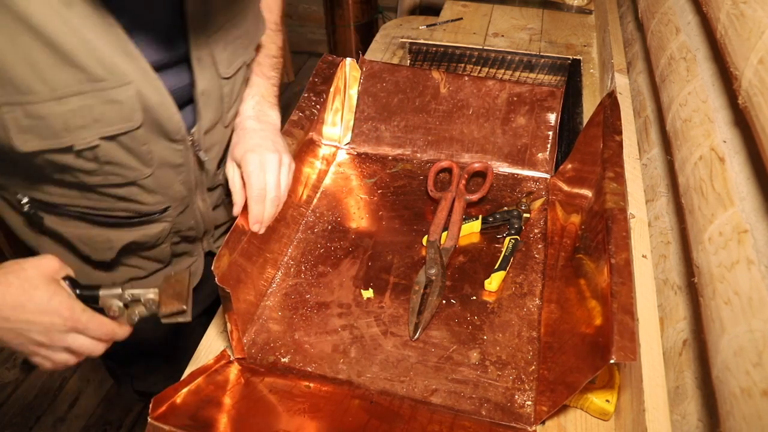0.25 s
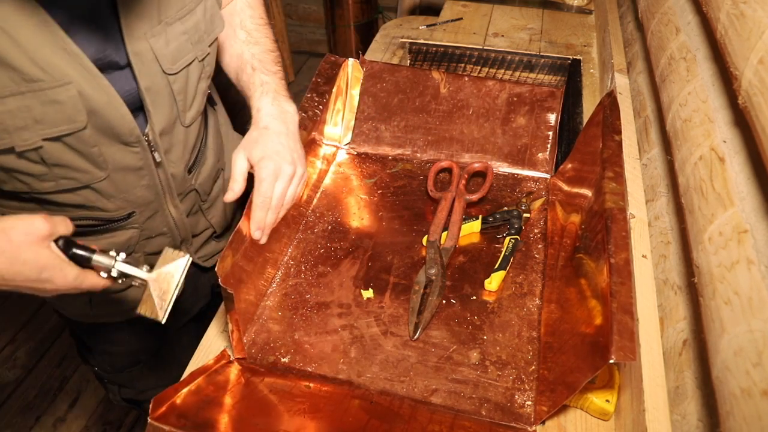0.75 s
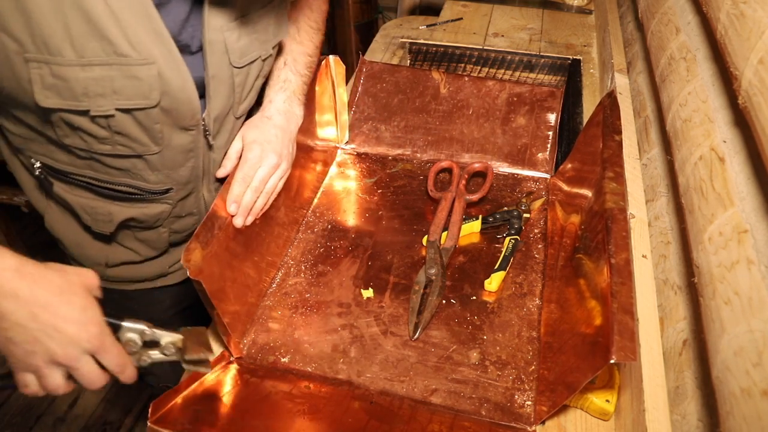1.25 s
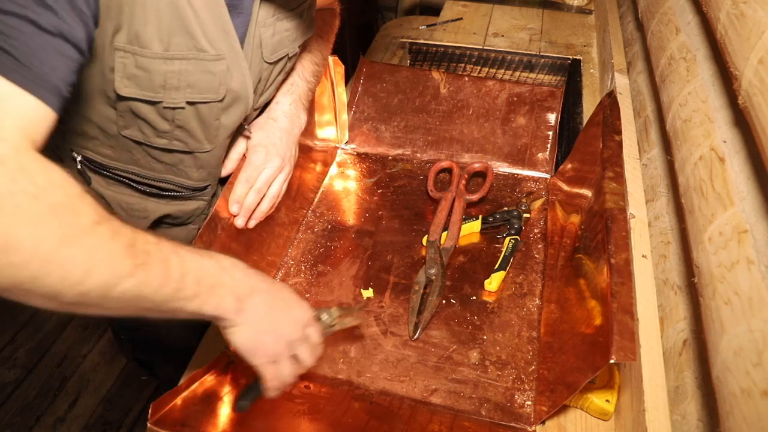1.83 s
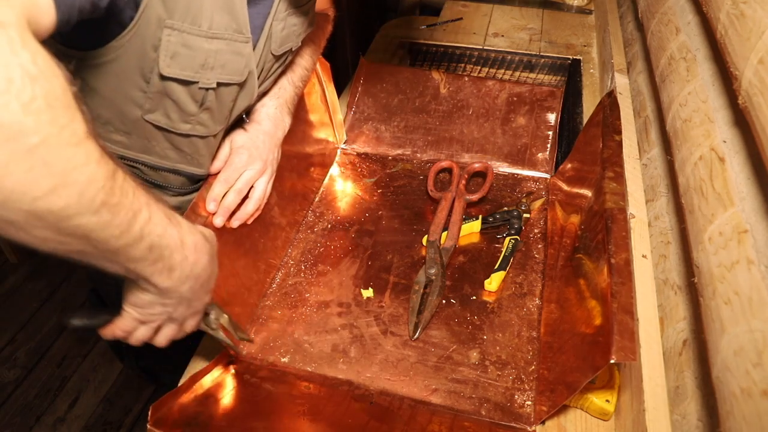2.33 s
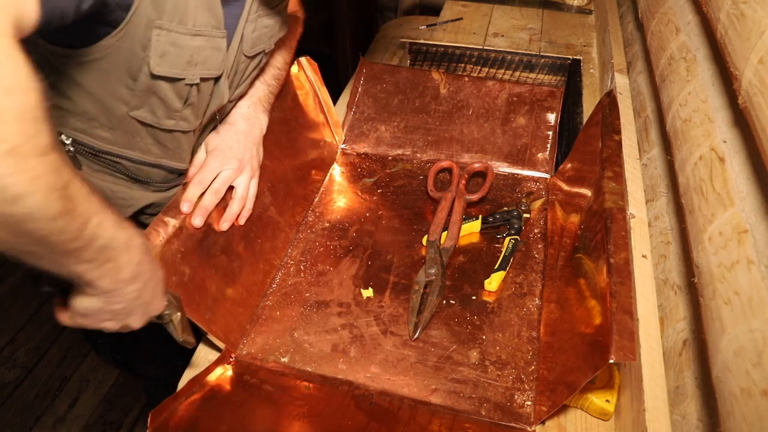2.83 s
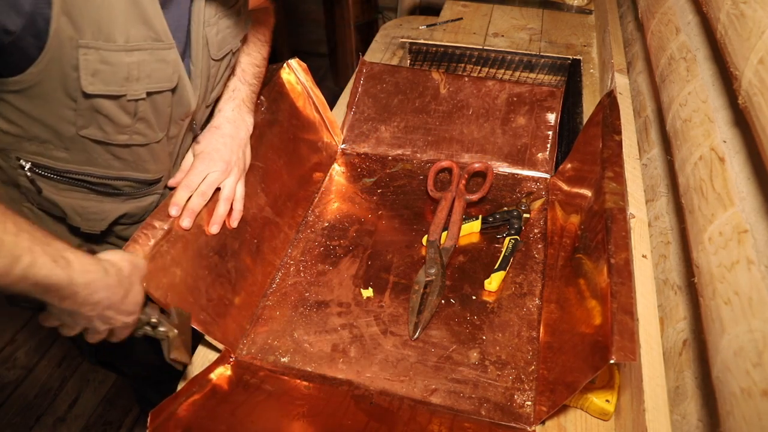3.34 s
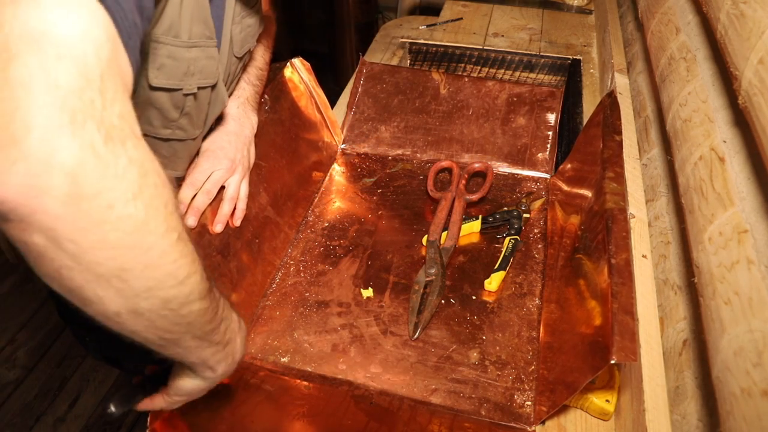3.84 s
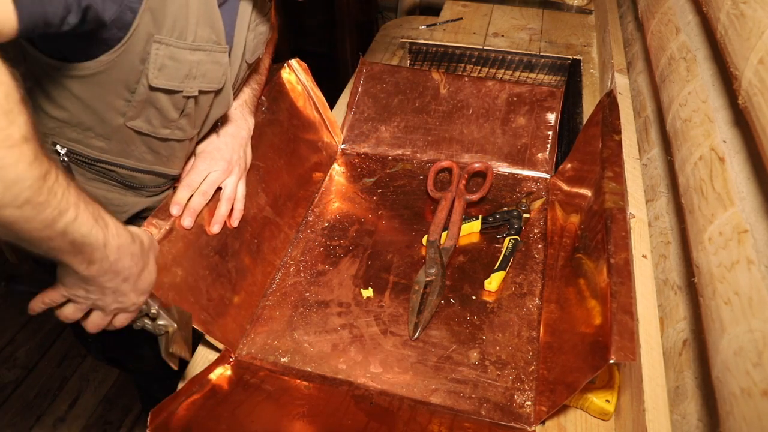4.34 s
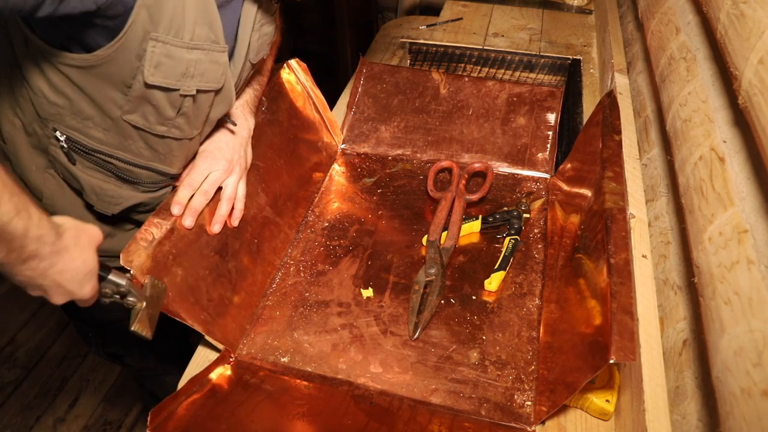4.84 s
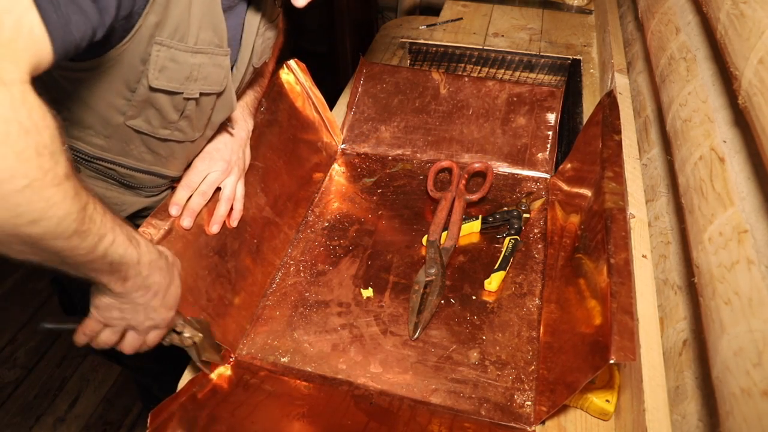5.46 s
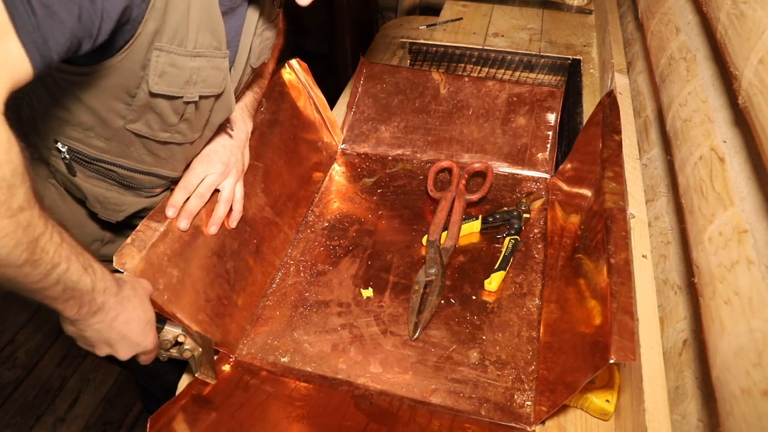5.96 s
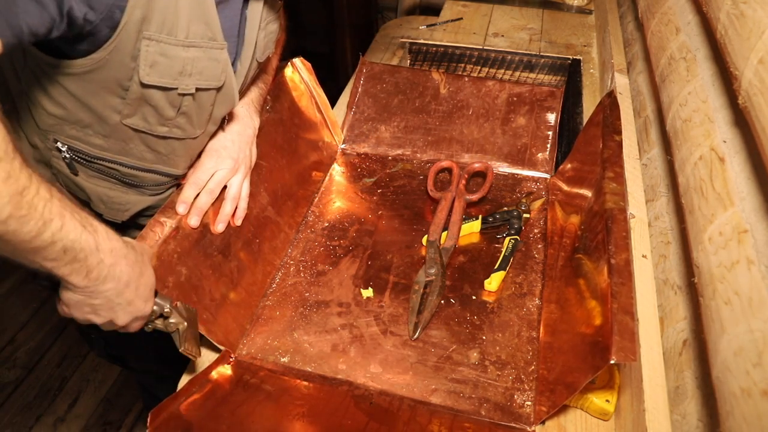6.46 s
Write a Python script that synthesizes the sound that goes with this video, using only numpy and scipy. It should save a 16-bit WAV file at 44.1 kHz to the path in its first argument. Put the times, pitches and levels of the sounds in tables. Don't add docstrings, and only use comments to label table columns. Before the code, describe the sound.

Quiet rubbing and light taps give way to rattling, creaking sheet copper, plier clacks and low booms in a small workshop.

```python
import sys
import numpy as np
from scipy import signal
from scipy.fft import rfft, irfft
from scipy.io import wavfile
from scipy.ndimage import uniform_filter1d

SR = 44100
rng = np.random.default_rng(int(sys.argv[2]) if len(sys.argv) > 2 else 0)


def undo_db(level):
    steps = np.asarray(level, float) / 20
    return 10 ** steps


def waveform_to_disk(signal):
    frames = np.transpose(np.atleast_2d(signal))
    scaled = np.clip(frames, -1, 1) * 32767
    samples = np.round(scaled).astype(np.int16)
    wavfile.write(sys.argv[1], SR, samples)


N = 295911

# start in seconds, peak in dB, pitch in Hz,
# time to fall 60 dB in seconds, share sent into the sheet in dB.
BUCKLES = [
    (.545, -14, 192, 0.12, 3),
    (1.181, -10, 175.4, 0.36, 3),
    (2.481, -11.5, 226, 0.11, -7),
    (2.836, -0.5, 125, 0.14, -16),
    (2.915, -5, 319, .04, -24),
    (4.408, -7, 132, 0.06, -14),
    (6.212, -18.5, 201, 0.31, 11),
]


def evened(x):
    return x / np.sqrt(np.mean(x ** 2) + 1e-20)


def read(points, hz):
    f, value = np.transpose(points)
    return np.interp(np.log(hz + 1), np.log(f + 1), value)


def add(mix, s, sound):
    part = mix[round(s * SR):][:len(sound)]
    part += sound[:len(part)]


def coloured(x, points):
    hz = np.fft.rfftfreq(len(x), 1 / SR)
    return irfft(rfft(x) * undo_db(read(points, hz)), len(x))


def resonate(x, hz, width):
    turn = np.exp(2j * np.pi * np.cumsum(hz * np.ones(len(x))) / SR)
    r = np.exp(-np.pi * width / SR)
    smooth = signal.lfilter([1 - r], [1, -r], x / turn + 1e-18)
    return 2 * (turn * smooth).real


def strokes(rows, rise_db_per_s, fall_db_per_s):
    t = np.arange(0, N / SR + .01, .001)[:, None]
    s, hold, db = np.transpose(rows)
    before_db = rise_db_per_s * np.maximum(s - t, 0)
    after_db = fall_db_per_s * np.maximum(t - s - abs(hold), 0)
    level = np.sqrt((undo_db(db - (before_db + after_db)) ** 2).sum(axis=1))
    return np.interp(np.arange(N) / SR, t[:, 0], level)


def hiss():
    # Hz, dB per Hz.
    hiss_colour = [(15, -38), (25, 5), (45, 7), (92, -1), (560, -7.5), (677, -2), (911, -8), (1130, -7.5),
                   (1650, -31), (1940, -14), (4370, -21.5), (16000, -29.5)]
    whine_hz, whine_db = 10648, -76
    whine = np.sqrt(2) * undo_db(whine_db) * np.sin(2 * np.pi * whine_hz * np.arange(N) / SR)
    return undo_db(-45.5) * evened(coloured(rng.standard_normal(N), hiss_colour)) + whine


def wobble():
    # time in seconds, level in dB.
    leaning = [(0.0, -36), (.15, -40), (.45, -66), (.6, -34), (.8, -39.5), (1.1, -59), (1.4, -38),
               (1.76, -40), (2.11, -61), (2.3, -35), (3.0, -43), (3.27, -25.5), (3.55, -35.5),
               (4.76, -35.5), (4.9, -40), (5.4, -30.5), (6.13, -46), (6.4, -32.5)]
    # Hz, dB per Hz.
    rumble_colour = [(15, -57), (25, -18), (92, -2), (113, -5), (167, -14), (200, -0.5), (260, -6),
                     (440, -120)]
    shake_db, shake_hold_s, shake_fall_db_per_s = -22.5, 0.053, 122
    s, db = np.transpose(leaning)
    rumble = coloured(rng.standard_normal(N), rumble_colour)
    rumble = rumble + undo_db(6.0) * resonate(rumble, 68.3, 7.1) + undo_db(3) * resonate(rumble, 106.6, 10.4)
    shakes = [(row[0], shake_hold_s, shake_db + row[1]) for row in BUCKLES]
    shake = strokes(shakes, 770, shake_fall_db_per_s)
    lean = undo_db(np.interp(np.arange(N) / SR, s, db))
    return (lean + shake) * evened(rumble)


def effort():
    # start in seconds, hold in seconds, force in dB, stiffness in dB.
    jolts = [(.549, .08, -38, -12), (.001, .03, -34, -1.5), (1.197, 0.032, -26.5, -1.5),
             (1.495, 0.0092, -37.5, 2.5), (2.836, 0.03, -22, 6.5), (2.93, 0.05, -23.5, 4),
             (2.337, 0.029, -29, -17), (2.478, 0.094, -19.5, -1.5), (2.743, .01, -25, 2),
             (2.789, 0.0091, -23.5, 6.5), (3.625, 0.073, -25.5, 1), (3.906, 0.15, -29, 6.5),
             (4.117, 0.18, -29, 8.5), (4.28, .01, -36.5, 12), (4.407, 0.033, -25, 3.5),
             (5.092, 0.035, -33.5, 2.5), (5.65, .17, -27, -2.5), (6.212, 0.07, -22, 3),
             (6.334, 0.053, -21, -2), (6.59, 0.019, -19, -2)]
    # full bend in seconds, hold in seconds, force in dB, stiffness in dB.
    bends = [(1.347, 0.017, -44, -24), (1.65, .02, -39, -30), (1.785, .05, -40.5, -4),
             (2.211, 0.09, -37, -2), (3.073, 0.12, -20.5, -12.5), (3.442, 0.043, -22.5, 5),
             (3.76, 0.052, -23.5, 0.5), (4.502, 0.24, -25, 2.5), (4.85, 0.017, -32.5, 0),
             (4.994, 0.025, -34.5, 1), (5.244, 0.047, -25.5, 3.5), (5.522, 0.052, -34.5, 14.5),
             (6.497, .01, -24.5, 9)]
    # start in seconds, hold in seconds, force in dB, brightness in dB.
    slips = [(1.2, .005, -34, -8), (1.49, .01, -37, -20), (1.756, .07, -42.5, -12), (2.339, .02, -28, -12),
             (2.481, 0.0034, -21.5, 1.5), (2.483, 0.088, -25.5, -11), (2.74, .005, -28.5, -7),
             (2.777, 0.0036, -21, -27), (2.917, .02, -27.5, -22), (3.2, 0.016, -47, -7),
             (3.371, 0.062, -29, -7.5), (3.616, 0.023, -26, -18), (3.907, 0.0073, -20.5, -14),
             (4.111, 0.042, -20, -17.5), (4.276, .012, -17, -8), (4.404, .005, -21.5, -26),
             (4.512, 0.014, -21, -5), (4.567, 0.056, -18, -10.5), (4.845, .01, -33.5, -28),
             (5.086, 0.04, -38, -12), (5.475, 0.035, -31.5, -20), (5.642, 0.004, -16, -20),
             (5.667, 0.13, -30.5, -30), (6.21, 0.019, -21, -13), (6.32, 0.018, -21.5, -23),
             (6.587, 0.0092, -31, -7)]
    # full pull in seconds, hold in seconds, force and brightness in dB.
    drags = [(3.87, .03, -37, -8), (2.665, .02, -39, -9), (3.75, .02, -33, -10), (3.21, .08, -51, -8),
             (0.078, .005, -33.5, -3), (2.208, 0.061, -35.5, -7), (3.467, 0.022, -20, -10),
             (4.1, 0.023, -34.5, -6), (5.206, 0.045, -17.5, -6.5), (5.55, 0.099, -26, -7.5),
             (6.367, 0.016, -37.5, 4.5), (6.49, 0.01, -19, -7), (4.48, .01, -35, -1), (3.82, .03, -39, -14),
             (5.16, .01, -33, -9), (5.78, .03, -33, -24), (3.66, 0.0086, -30.5, -18),
             (4.2, 0.014, -27, -15), (0.736, 0.0084, -58, -10)]
    release = [92, 125, 148.4, 240]
    rest = [-57.5, -54, -55.5, -68]
    sudden_db_per_s, growing_db_per_s = 5000, 255
    bending = [(jolts, sudden_db_per_s), (bends, growing_db_per_s)]
    gripping = [(slips, sudden_db_per_s), (drags, growing_db_per_s)]
    levels = []
    for k, kinds in enumerate([bending, bending, gripping, gripping]):
        level = undo_db(rest[k])
        for rows, rise in kinds:
            moves = [(s, hold, db + k % 2 * tilt_db) for s, hold, db, tilt_db in rows]
            level = level + strokes(moves, rise, release[k])
        levels.append(level)
    return levels


def scrape():
    splits = [450, 1400, 4500]
    # Hz, dB per Hz.
    scrape_colour = [(18, -50), (30, -19), (98, -4.5), (174, -9), (311, -1.5), (415, -3.5), (684, 3.5),
                     (962, -0.5), (2750, -6.5), (4300, -12), (6300, -21), (10200, -26), (16000, -16)]
    grain_size = undo_db(3.0 * np.minimum(rng.exponential(1, N), 3))
    grain_here = rng.random(N) < 2500 / SR
    slips = rng.standard_normal(N) * grain_size * grain_here
    stutter = evened(uniform_filter1d(uniform_filter1d(rng.standard_normal(N), 300), 300))
    grains = (evened(slips) + 0.76 * rng.standard_normal(N)) * undo_db(2.5 * stutter)
    hz = np.fft.rfftfreq(N, 1 / SR)
    spectrum = rfft(coloured(grains, [(60, -40), (140, 7.5), (16000, -10)]))
    spectrum = spectrum * undo_db(read(scrape_colour, hz))
    below = [0] + [1 / (1 + (hz / f) ** 6) for f in splits] + [1]
    rub = np.zeros(N)
    for level, low, high in zip(effort(), below, below[1:]):
        rub += level * evened(irfft(spectrum * (high - low), N))
    return rub


def sheet_ring(strong_db):
    # Hz, dB, time to fall 60 dB in seconds.
    strong_modes = [(112, -42, 5.0), (223.5, 1.5, 0.64), (312.1, -11.5, 5.0), (390, -10.5, 0.3),
                    (566, -14, 0.18), (685, -17.5, 0.053), (841, -19, 0.91), (915, -13, 0.31),
                    (1140, -51, 1.2), (1060, -11.5, 2.6), (1110, -38, 1.3), (1602, -17, 0.13),
                    (2140, -26, 0.41), (2870, -2.5, 0.36)]
    # Hz, time to fall 60 dB in seconds.
    dense_decay = [(60, 0.14), (300, 0.83), (1000, 0.42), (3000, 0.14), (6000, 0.12), (15000, 0.058)]
    hz, t, z = signal.stft(rng.standard_normal(SR), SR, nperseg=512)
    t60 = np.maximum(read(dense_decay, hz), .02)[:, None]
    dense = signal.istft(z * undo_db(-60 * t / t60) / np.sqrt(t60), SR, nperseg=512)[1][:SR]
    t = np.arange(SR) / SR
    strong = np.zeros(SR)
    for f, db, t60 in strong_modes:
        bent_hz = f * rng.uniform(0.95, 1.015)
        strong += undo_db(.5 * db - 60 * t / min(t60, .3)) * np.sin(2 * np.pi * bent_hz * t)
    ring = evened(dense) + undo_db(strong_db) * evened(strong)
    return ring / np.linalg.norm(evened(dense))


def sheet(drive):
    turn = 2 * np.pi * 1.099 * np.arange(N) / SR
    out = np.zeros(N)
    for k in range(3):
        share = np.sqrt(2 / 3) * np.cos(turn / 2 - k * np.pi / 3)
        out += signal.oaconvolve(drive * share, sheet_ring(-16.5))[:N]
    return out


def brushes():
    # middle in seconds, level in dB, half-length in seconds.
    passes = [
        (0.356, -47.5, 0.11),
        (0.741, -48.5, .03),
        (1.074, -51.5, 0.049),
        (1.436, -50, 0.057),
        (1.61, -48, .03),
        (4.998, -42.5, 0.025),
    ]
    # Hz, dB per Hz.
    brush_colour = [(300, -16), (1000, -6), (2600, 7), (5000, -5), (14000, -17)]
    t = np.arange(N) / SR
    swell = sum(undo_db(db) * np.exp(-((t - s) / half) ** 2) for s, db, half in passes)
    return swell * evened(coloured(rng.standard_normal(N), brush_colour))


def held_shapes(rub):
    # start in seconds, end in seconds, low ring in Hz, high ring in Hz, level in dB.
    shapes = [(0.26, 0.517, 386, 600, 3), (1.19, 1.34, 1030, 2390, 2), (1.783, 1.91, 670, 2150, -3),
              (.56, .85, 310, 390, 2.5), (2.19, 2.43, 497, 1033, 5), (2.485, 2.595, 532, 1030, 1),
              (2.93, 3.363, 310, 697, -4), (3.375, 3.556, 1075, 1600, -1.5), (3.655, 3.77, 1083, 1600, 2),
              (3.74, 3.83, 700, 1000, 2), (5.29, 5.37, 600, 1050, 2), (5.19, 5.28, 2300, 4200, 0),
              (6.49, 6.52, 950, 3900, 2), (2.785, 2.84, 2750, 4300, 0), (3.91, 4.285, 682, 773, 4),
              (4.27, 4.398, 689, 2670, -13), (4.42, 4.802, 307, 528, 1.5), (4.57, 4.655, 2410, 2705, 3),
              (5.2, 5.33, 1040, 1793, -7.5), (5.482, 5.637, 910, 1670, 0), (5.65, 5.701, 1595, 2190, -4),
              (6.205, 6.313, 520, 2710, 1.5), (6.297, 6.395, 690, 1870, 3), (6.443, 6.535, 506, 2630, 6.5)]
    fade_s, width_hz, width_share = .012, 7.1, 0.03
    rise = .05
    out = np.zeros(N)
    for start, end, *rings, db in shapes:
        part = rub[round(start * SR):round(end * SR)]
        creep = 1 + rise * np.linspace(-.5, .5, len(part))
        sung = undo_db(db) * sum(resonate(part, hz * creep, width_hz + width_share * hz) for hz in rings)
        add(out, start, sung * signal.windows.tukey(len(part), 2 * fade_s / (end - start)))
    return out


def ticks():
    # start in seconds, peak in dB, low ping in Hz, high ping in Hz, high ping in dB.
    clicks = [(.336, -35.5, 3000, 5500, -21), (.4674, -42, 2000, 7400, -6), (2.0014, -31.5, 2550, 5430, -8),
              (3.1921, -36.5, 2080, 8700, -2), (3.6341, -13, 2610, 10300, -13),
              (4.263, -35, 7400, 12000, -1), (4.41, -18, 2480, 10400, -5), (4.8294, -27, 2400, 4600, -40),
              (4.9154, -32, 2530, 5330, -31), (4.9404, -29, 2410, 4510, -38), (5.087, -29, 2450, 4750, -23),
              (5.105, -26, 2350, 4520, -11), (5.552, -21, 2520, 4860, 0.5), (6.1898, -32, 2770, 4960, -26),
              (6.4394, -30, 2610, 7360, 2), (6.5857, -27, 1910, 5550, 4)]
    ping_t60_s, snap_t60_s = .018, .03
    out, t = np.zeros(N), np.arange(SR // 8) / SR
    for s, db, low_hz, high_hz, high_db in clicks:
        pings = np.sin(2 * np.pi * low_hz * t) + undo_db(high_db) * np.sin(2 * np.pi * high_hz * t)
        snap = resonate(resonate(rng.standard_normal(len(t)), 1.2 * low_hz, 2000), 1.2 * low_hz, 2000)
        snap = .5 * evened(snap) * undo_db(-60 * t / snap_t60_s)
        add(out, s, undo_db(db - 1) * (pings * undo_db(-60 * t / ping_t60_s) + snap))
    return out


def thumps():
    slap_db = -7.5
    direct, sent, t = np.zeros(N), np.zeros(N), np.arange(SR // 2) / SR
    for s, db, hz, t60, sent_db in BUCKLES:
        rumble = resonate(resonate(rng.standard_normal(len(t)), 330, 330), 330, 330)
        modes = [(1, 1), (1.4, 0.66), (1.5, 0.29)]
        boom = sum(share * np.sin(2 * np.pi * ratio * hz * t) for ratio, share in modes)
        onset = np.minimum(t / 0.0033, 1)
        thump = undo_db(db - 5.5) * (boom + undo_db(slap_db) * evened(rumble)) * onset
        push = undo_db(-60 * t / .04)
        add(direct, s, thump * (undo_db(-60 * t / t60) + 0.36 * push))
        add(sent, s, undo_db(sent_db + 6) * thump * push)
    return direct, sent


def pops():
    # start in seconds, peak in dB, pitch in Hz, time to fall 60 dB in seconds.
    dents = [(1.195, -8, 202, 0.04), (1.211, -8, 226, 0.04), (1.264, -17, 218, 0.04),
             (2.344, -18, 476, 0.04), (2.835, -2, 256, 0.04), (2.851, -4, 479, 0.04),
             (2.865, -5, 296, 0.04), (2.912, -5, 331, 0.04), (2.921, -1, 318, 0.04), (3.129, -8, 218, 0.04),
             (3.181, -11, 250, 0.04), (3.682, -5, 1070, 0.04), (3.745, -7, 380, 0.04),
             (3.764, -7, 689, 0.04), (3.974, -6, 794, 0.04), (4.006, -9, 694, 0.04), (4.121, -6, 692, 0.04),
             (4.485, -6, 307, 0.04), (4.645, -4, 310, 0.04), (5.194, -12, 713, 0.04),
             (5.329, -11, 705, 0.04), (5.359, -14, 245, 0.04), (5.596, -11, 789, 0.04),
             (5.636, -8, 937, 0.04), (5.855, -17, 326, 0.04), (6.219, -8, 210, 0.04),
             (6.233, -5, 517, 0.04), (6.289, -8, 320, 0.04), (6.349, -7, 240, 0.04), (6.386, -8, 528, 0.04),
             (6.514, -7, 910, 0.04), (6.544, -11, 223, 0.04), (6.592, -5, 307, 0.04),
             (6.609, -7, 339, 0.04), (6.624, -9, 390, 0.04)]
    # start in seconds, peak in dB, pitch in Hz, time to fall 60 dB in seconds.
    crackles = [(1.1914, -21, 2620, 0.02), (2.3396, -19, 2030, 0.02), (2.4904, -8, 1890, 0.02),
                (2.5526, -10, 2160, 0.02), (2.5744, -14, 1770, 0.02), (2.8094, -15, 2490, 0.02),
                (2.8344, -15, 1500, 0.02), (3.4406, -10, 1530, 0.02), (3.4644, -10, 1560, 0.02),
                (3.6754, -14, 1500, 0.02), (4.1834, -9, 1600, 0.02), (4.2053, -11, 1540, 0.02),
                (4.2762, -3, 2510, 0.02), (4.2924, -5, 2730, 0.02), (4.366, -15, 2150, 0.02),
                (4.4702, -14, 1680, 0.02), (4.5795, -7, 2680, 0.02), (4.6344, -3, 2360, 0.02),
                (4.9397, -20, 2450, 0.02), (5.0863, -22, 2320, 0.02), (5.1682, -12, 2250, 0.02),
                (5.2016, -5, 2410, 0.02), (5.2344, -6, 1530, 0.02), (5.2454, -5, 1680, 0.02),
                (5.2534, -7, 1600, 0.02), (5.2694, -11, 1770, 0.02), (6.2108, -6, 2750, 0.02),
                (6.4664, -9, 2450, 0.02), (6.4984, -9, 2730, 0.02), (6.5114, -9, 1520, 0.02),
                (6.5954, -14, 1880, 0.02)]
    out, t = np.zeros(N), np.arange(SR // 10) / SR
    bite = np.diff(np.exp(-t / .00005), prepend=0)
    partials = [(1, 1), (1.57, .4), (2.31, .12)]
    for rows, base_db, bite_db in [(dents, -5, -60), (crackles, -6.5, -15)]:
        for s, db, hz, t60 in rows:
            modes = sum(share * np.sin(2 * np.pi * ratio * hz * t) for ratio, share in partials)
            dying = modes * undo_db(-60 * t / max(t60, .004))
            add(out, s, undo_db(db + base_db) * (dying + undo_db(bite_db) * bite))
    return out


def knocks():
    # start in seconds, peak in dB, pitch in Hz, time to fall 60 dB in seconds,
    # share sent into the sheet in dB.
    blows = [(1.277, -33, 2190, 0.25, -9), (1.4932, -28, 2390, 0.25, -27), (2.2009, -27, 2190, .087, -14),
             (2.3415, -22, 2000, 0.063, -5), (2.7405, -23, 1470, .068, -32),
             (2.7807, 0.5, 2460, 0.039, -4.5), (2.921, -4, 750, .03, -18), (3.321, -32, 1500, .08, -14),
             (3.518, -14.5, 1580, 0.11, -25), (3.6147, -12, 2440, 0.18, -9),
             (3.6623, -10.5, 1590, 0.054, -29), (3.7365, -28, 1480, .067, 16.5),
             (3.9114, -1.5, 1400, 0.094, -10), (4.121, -21, 2010, 0.064, -10),
             (4.2757, -6.5, 2530, 0.15, -11), (4.408, -8, 1520, 0.063, -2), (4.8416, -20, 2260, 0.15, -19),
             (5.5505, -19, 1720, .19, -2), (5.6436, 4, 1950, 0.084, -24), (6.211, -12.5, 2480, 0.076, -30),
             (6.3189, -25, 1980, 0.13, 13), (6.4446, -12.5, 1430, 0.074, 11.5)]
    raps = [
        (1.1997, -22.5, 1460, 0.083, -14),
        (1.764, -23.5, 1170, 0.059, -2),
        (2.4771, -8, 2850, 0.12, -14),
        (3.3782, -26, 1460, .16, 9.5),
        (4.133, -18.5, 2360, .12, -10),
        (4.5147, -5.5, 1620, 0.058, -40),
        (5.193, -12, 2300, 0.22, -11),
        (5.462, -27.5, 1690, 0.079, 10.5),
        (6.5856, -12, 1940, .062, -17),
    ]
    blow_edge_db, rap_edge_db = -40, -5.5
    hits = [row + (blow_edge_db,) for row in blows] + [row + (rap_edge_db,) for row in raps]
    direct, sent, t = np.zeros(N), np.zeros(N), np.arange(SR // 4) / SR
    for s, db, hz, t60, sent_db, edge_db in hits:
        noise = rng.standard_normal(len(t))
        wide = resonate(resonate(noise, 0.9 * hz, 1.13 * hz), 0.9 * hz, 1.13 * hz)
        local = resonate(noise, hz, 0.029 * hz)
        crack = (evened(wide) + 0.78 * evened(local)) * undo_db(-60 * t / t60)
        edge = evened(resonate(resonate(noise, 3670, 7500), 3670, 7500))
        edge = edge * undo_db(edge_db - 60 * t / (0.28 * t60))
        first = 1 + 0.82 * undo_db(-60 * t / 0.0058)
        knock = undo_db(db - 10.5) * (crack + edge) * first * np.minimum(t / 0.00089, 1)
        add(direct, s, knock)
        add(sent, s, undo_db(sent_db) * knock)
    return direct, sent


def scene():
    rub = scrape()
    sung = held_shapes(rub)
    tick = ticks()
    thump, thump_sent = thumps()
    pop = pops()
    knock, knock_sent = knocks()
    drive = undo_db(-5.5) * rub + undo_db(-5.5) * sung + knock_sent + thump_sent
    drive = drive + undo_db(-9.0) * tick + undo_db(-10) * pop
    touched = undo_db(-5.5) * rub + sung + knock + thump + tick + pop
    return (touched + sheet(drive) + wobble() + brushes())[None]


def roll_off(x):
    return signal.sosfilt(signal.butter(12, 16460, fs=SR, output="sos"), x)


def record(dry):
    dull = signal.sosfilt(signal.butter(2, [35, 9300], "band", fs=SR, output="sos"), dry)
    dull = signal.sosfilt(signal.butter(2, 32, "high", fs=SR, output="sos"), dull)
    power_db = 10 * np.log10(abs(uniform_filter1d(dull[0] ** 2, 800)) + 1e-12)
    fall = np.arange(N) * 27.0 / SR
    held_db = np.maximum.accumulate(power_db + fall) - fall
    over_db = np.clip(held_db + 18, 0, 13.)
    quieted_hiss = hiss() / undo_db(1.3 * uniform_filter1d(over_db, 400))
    full = np.clip(dull + quieted_hiss, -1, 1)
    edge = signal.firwin(255, 16420, window=("kaiser", 9), fs=SR)
    return roll_off(signal.oaconvolve(full, edge[None], "same"))


dry = scene()
out = record(dry)
waveform_to_disk(out)
```